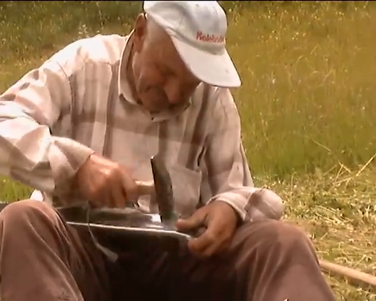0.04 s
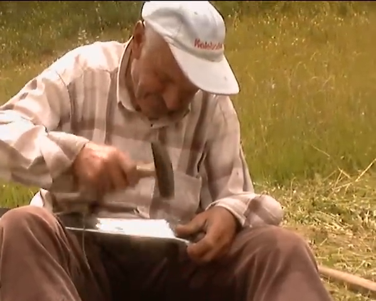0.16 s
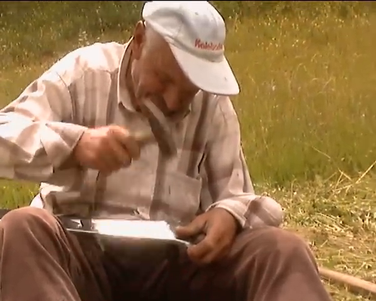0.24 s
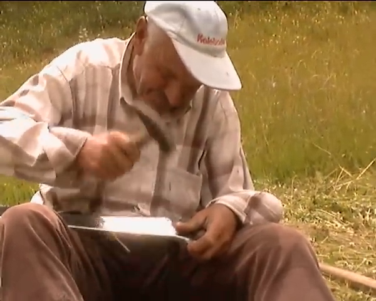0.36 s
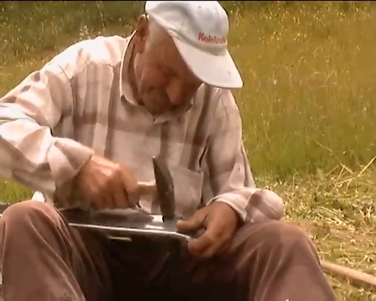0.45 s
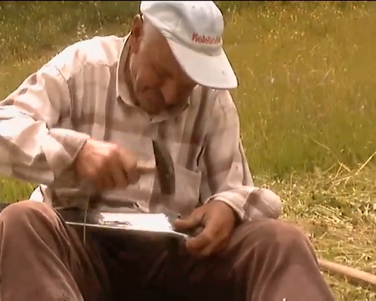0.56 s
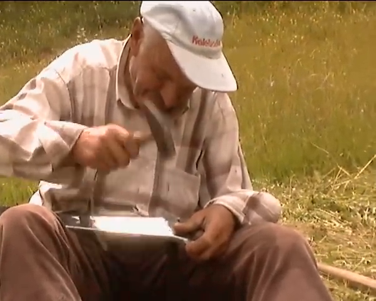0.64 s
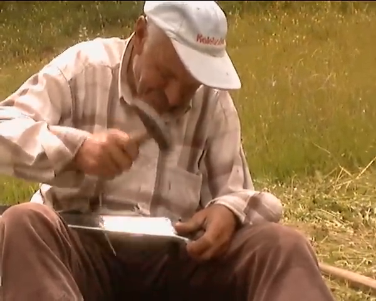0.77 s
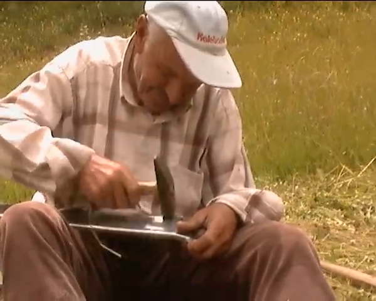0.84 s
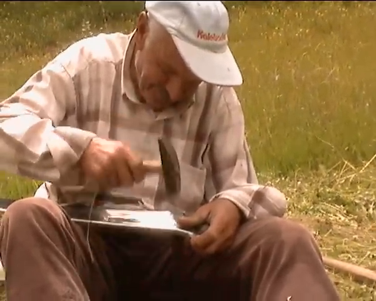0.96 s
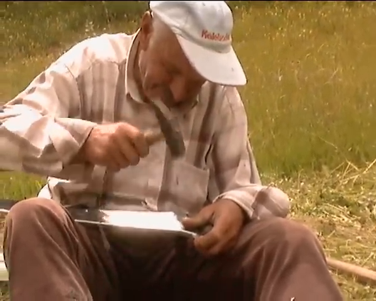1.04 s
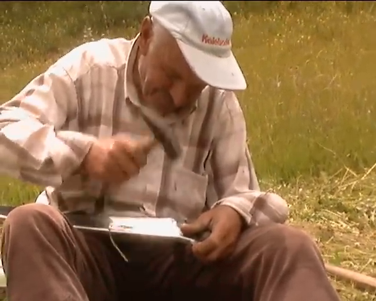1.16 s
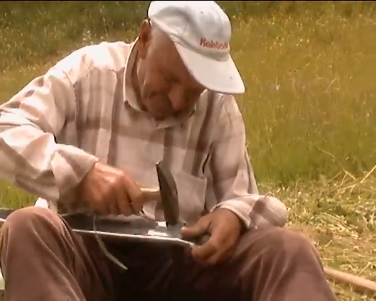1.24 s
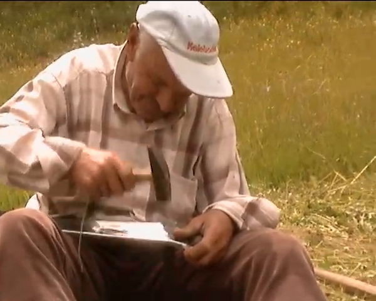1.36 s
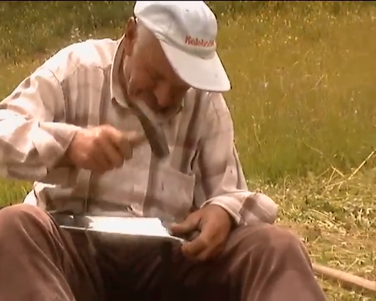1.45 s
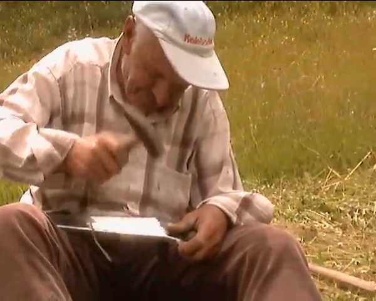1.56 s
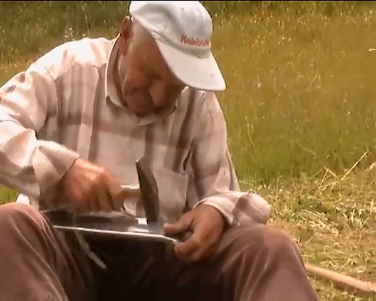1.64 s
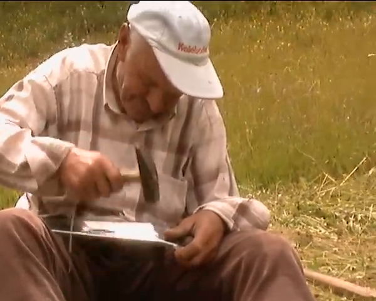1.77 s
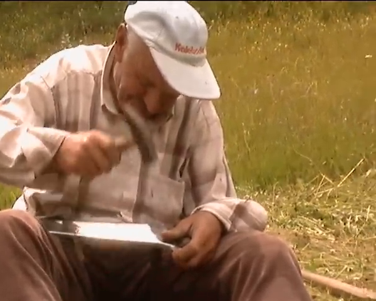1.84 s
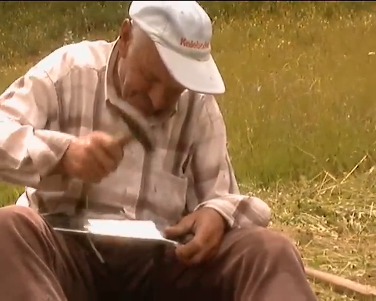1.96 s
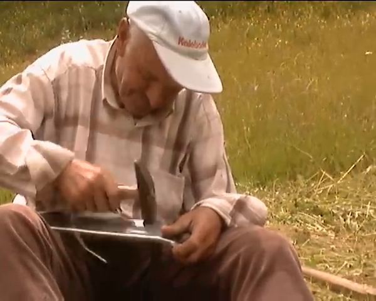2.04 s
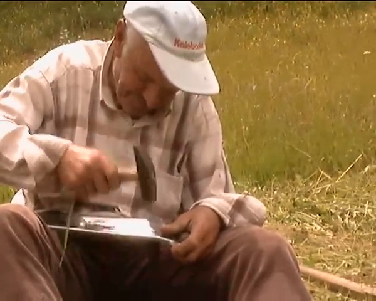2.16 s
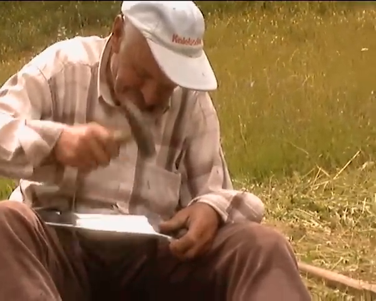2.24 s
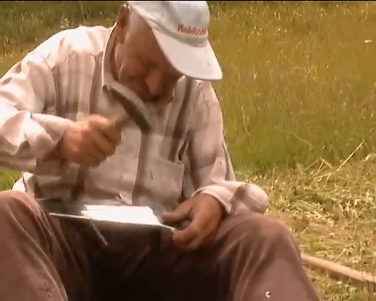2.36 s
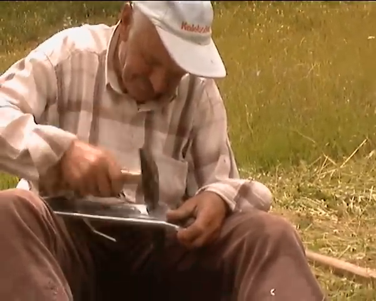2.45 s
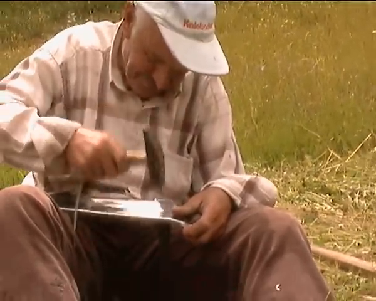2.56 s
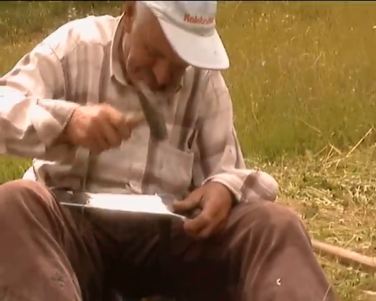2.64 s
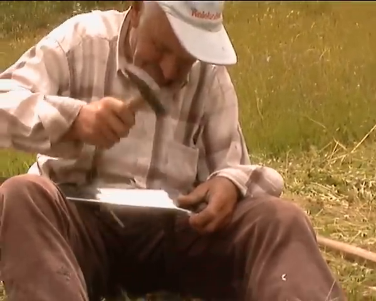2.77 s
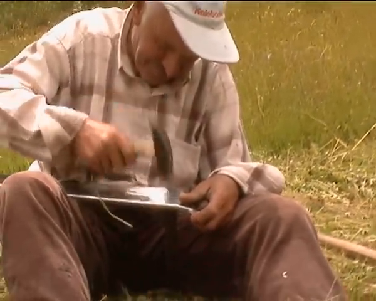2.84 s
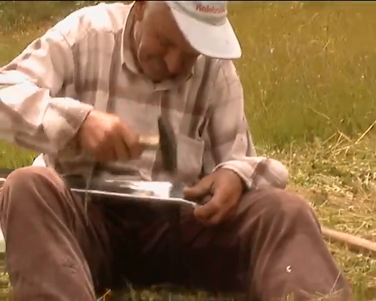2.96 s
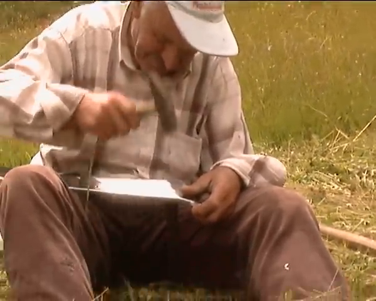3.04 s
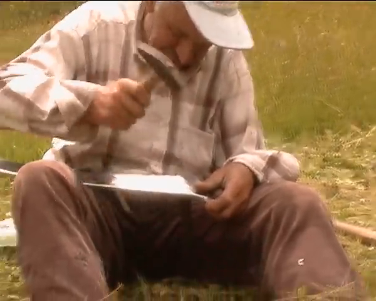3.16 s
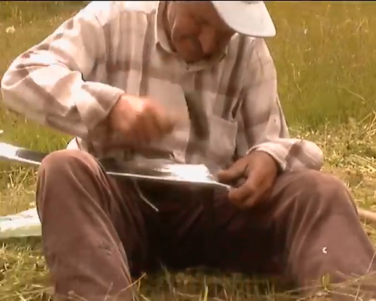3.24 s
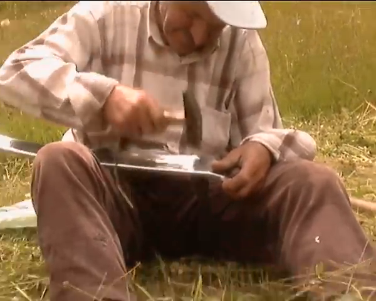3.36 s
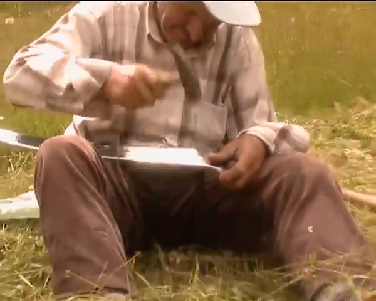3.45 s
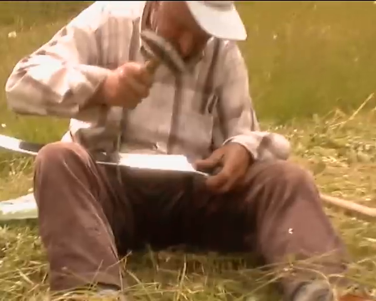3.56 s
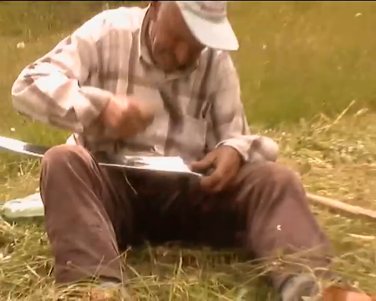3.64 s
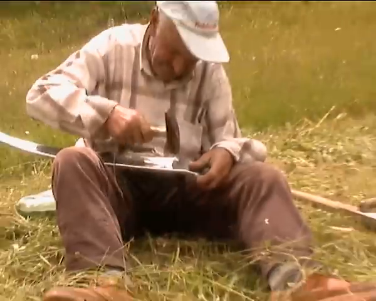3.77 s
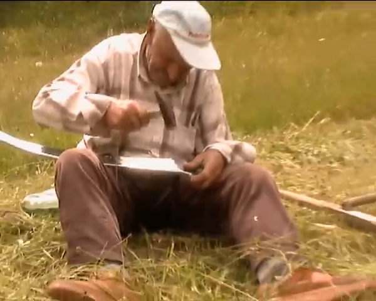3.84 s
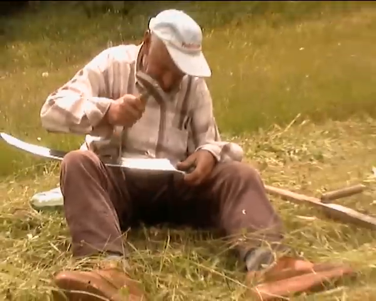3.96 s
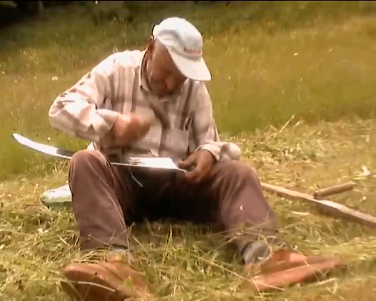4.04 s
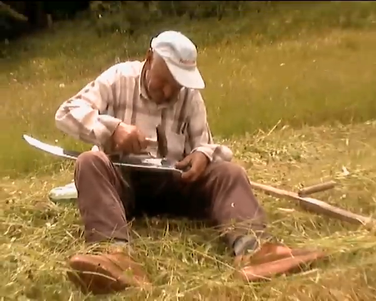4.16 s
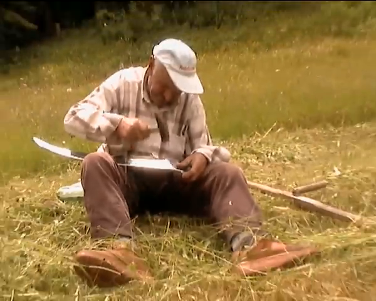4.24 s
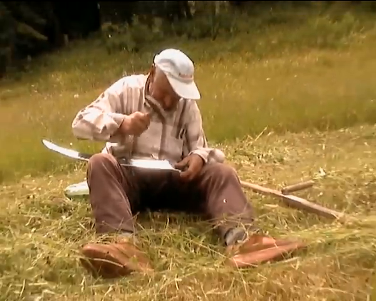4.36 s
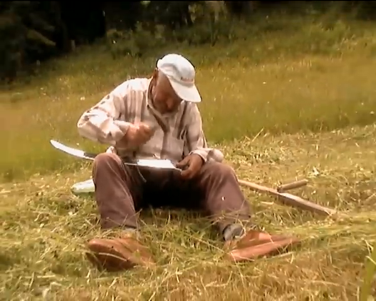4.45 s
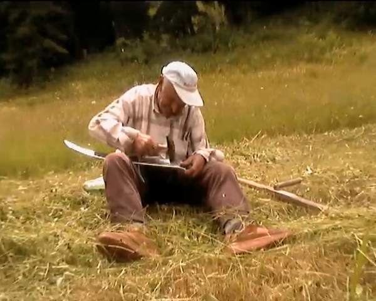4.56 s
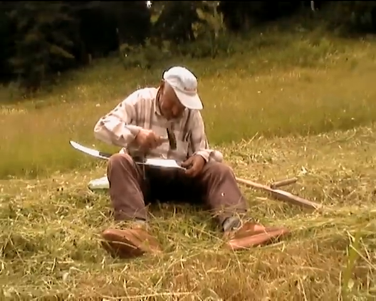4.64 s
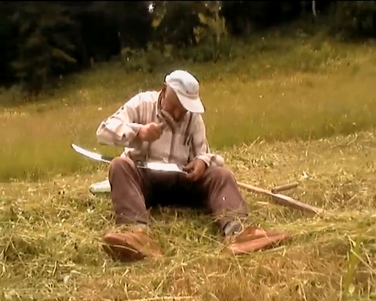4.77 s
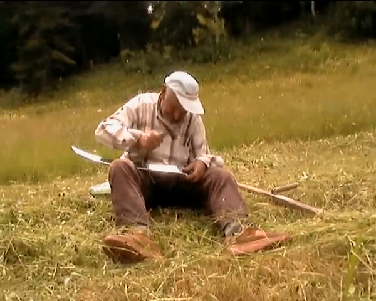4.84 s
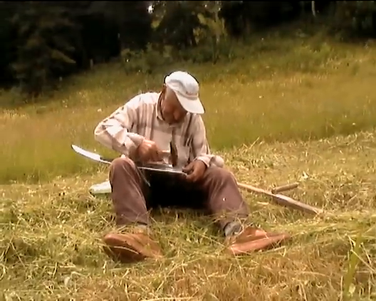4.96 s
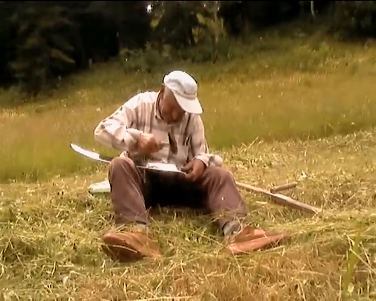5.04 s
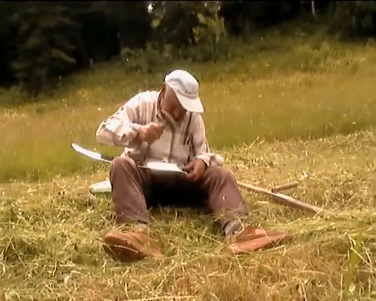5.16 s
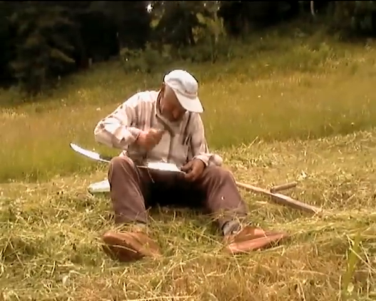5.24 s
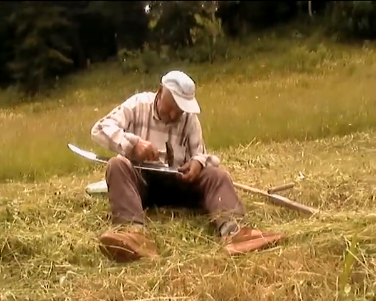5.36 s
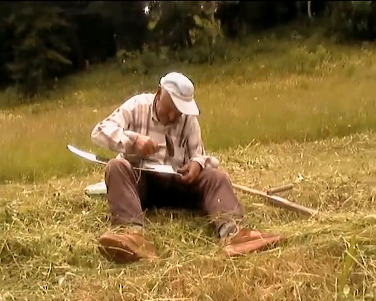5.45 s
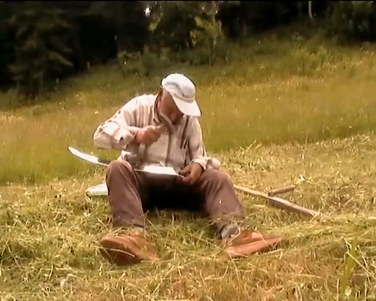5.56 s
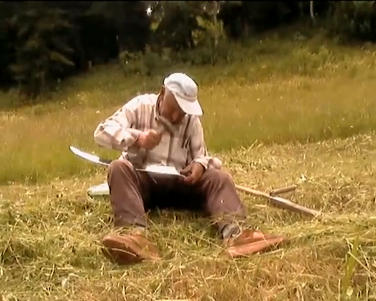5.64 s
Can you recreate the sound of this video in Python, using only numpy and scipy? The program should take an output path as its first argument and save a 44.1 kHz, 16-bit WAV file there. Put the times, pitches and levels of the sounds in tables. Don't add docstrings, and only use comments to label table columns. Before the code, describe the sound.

Fourteen evenly paced hammer blows on thin steel, from the very start to the end, dominate a quiet grassy field. Cracks are dry and high, with a faint thump and a dull slope reflection; the ringing varies as the blade slides between blows. Insects rasp weakly, a breeze briefly rumbles, and small plastic creaks occur around the middle. A single-channel camera microphone stays at a constant few metres, ducking slightly after every strike.

```python
import sys
import numpy as np
from scipy import signal
from scipy.fft import rfft, irfft, next_fast_len
from scipy.io import wavfile
from scipy.ndimage import map_coordinates

SR = 44100
rng = np.random.default_rng(int(sys.argv[2]) if len(sys.argv) > 2 else 0)


def bounce(signal):
    frames = np.transpose(np.atleast_2d(signal))
    limited = np.clip(frames, -1, 1)
    pcm = np.round(limited * 32767).astype(np.int16)
    wavfile.write(sys.argv[1], SR, pcm)


def volts_from_decibels(level):
    exponent = np.asarray(level, float) / 20
    return 10 ** exponent


N = 251370

# (time [s], level [dB])
GUST_LEVEL = [
    (0.0, -66),
    (0.47, -65),
    (0.68, -69),
    (1.67, -69.5),
    (2.2, -58.5),
    (2.68, -70.5),
    (3.09, -63.5),
    (3.33, -56),
    (3.49, -72.5),
    (5.7, -71),
]
# (frequency [Hz], density [dB per Hz])
GUST_COLOUR = [(15, 0), (25, -6.5), (80, 2.5), (160, -4), (300, -56)]
# (time [s], level [dB])
MEADOW_LEVEL = [
    (0.0, -61),
    (3.87, -59.5),
    (5.7, -60),
]
# (frequency [Hz], density [dB per Hz])
MEADOW_COLOUR = [(88, -6.5), (150, -2), (255, -1.5), (378, -4.5), (460, -3.5), (682, -8), (1120, -10.5),
                 (1530, -11.5), (5930, -12), (7370, -13), (10900, -13.5), (13600, -19.5), (16500, -54)]

# (time [s], crack [dB], thump [dB], ring [dB])
BLOWS = [(0.061, 0.5, -30.5, -8.5), (0.4713, 0.5, -36.5, 2), (0.8735, 0, -34.5, -0.6),
         (1.2663, -2, -33.5, -1.6), (1.6664, 0, -36, -1.3), (2.0753, 1.5, -35.5, -2.65),
         (2.484, 1.5, -41, 1.3), (2.8978, 2.5, -35.5, 1.1), (3.3047, 3, -44, -0.4), (3.713, -0.5, -38, -4),
         (4.124, -1, -36.5, 1.5), (4.5399, -0.5, -31.5, -18.5), (4.9462, 1.5, -40, 1.8),
         (5.3473, 2, -41.5, 2.5)]
BLADE_LIE = [(-0.08, 0.28, 0.77, 1.08), (0.108, 0.74, -0.033, 1.015), (0.11, 0.82, -0.2, 0.99),
             (0.159, 0.27, 0.21, 1.17), (0.41, 0.13, 0.32, 1.01), (0.458, 0.054, 0.3, 0.87),
             (0.47, 0.13, -0.022, 1.037), (0.62, -0.23, 0.73, 1.16), (0.63, 0.41, -0.095, 1.03),
             (0.66, -1.0, 0.32, 0.83), (0.77, -0.46, -0.49, 1.06), (0.89, -0.064, 0.65, 1.09),
             (0.901, 0.095, -0.28, 1.025), (0.94, -0.081, 0.029, 1.12)]
# (buzz length [s], buzz level [dB], hand closes after [s], added damping [dB per s])
BLADE_GRIP = [(0.036, -34, 0.33, 60), (.053, -24.5, 0.49, 59), (0.056, -29, 0.22, 28),
              (0.046, -29, 0.29, 50), (0.053, -27, 0.2, 45), (0.05, -29, 0.47, 58),
              (0.062, -27.5, 0.17, 88), (.072, -25.5, 0.24, 130), (0.064, -30, 0.31, 42),
              (0.05, -29, 0.37, 55), (0.06, -25, 0.64, 58), (0.048, -44, 0.14, 62), (0.05, -27, 0.18, 184),
              (0.069, -25, 0.16, 140)]
# (frequency [Hz], level [dB], t60 [s])
CRACK_PEAKS = [(1578, -5, 0.0086), (3190, 2, 0.0037), (5037, 0.5, 0.0043), (6730, 0, 0.0036),
               (8200, -10, 0.0051), (11740, -11, 0.0037)]
# (frequency [Hz], level [dB], t60 [s])
STAKE_MODES = [(118, -16.5, 0.038), (202, -2, 0.018), (312, 8.5, 0.014), (393, -9, 0.042)]
# (frequency [Hz], density [dB per Hz])
BUZZ_COLOUR = [(150, -35.5), (500, -14), (850, -12.5), (1400, -7.5), (2300, -1.4), (4000, -1.5), (6500, -8),
               (9000, -10.5), (12500, -15), (16000, -44.5)]
# (frequency [Hz], level [dB])
CLATTER_COLOUR = [(400, -6), (800, 4), (1300, -11), (2200, 12.5), (3500, -4.5), (6000, 9.5), (8500, 4.5),
                  (11500, -3), (15500, -39)]
# (frequency [Hz], t60 [s])
CLATTER_T60 = [(500, 0.32), (2000, 0.12), (6000, 0.08), (12000, 0.072)]

# (frequency at spot 0 [Hz], frequency at spot 1 [Hz])
BLADE_HZ = [(430, 444), (599, 618), (1292, 1293), (1364, 1364), (1464, 1517), (1649, 1694), (1800, 1814),
            (1856, 1872), (1931, 1945), (1980, 1985), (2257, 2264), (2341, 2359), (2361, 2375),
            (2845, 2887),
            (2991, 2987), (3277, 3303), (3394, 3392), (3486, 3484), (3633, 3649), (3912, 3922), (4051, 4041),
          (4137, 4158), (4191, 4204), (4247, 4251), (4269, 4274), (4516, 4563), (4730, 4746), (5009, 5011),
            (5409, 5373), (5518, 5509), (5683, 5656), (5765, 5780), (5817, 5818), (6061, 6052), (6318, 6347),
           (6382, 6373), (6607, 6596), (6813, 6816), (7564, 7591), (8260, 8256), (8552, 8533),
           (11138, 11119)]
# (level [dB], t60 [s], spot of a belly [edge lengths], half waves along the
BLADE_WAVES = [(-56.5, 1.5, 0.42, 3.71), (-47, 1.2, 1.857, 0.294), (-45.5, 0.49, 0.58, 2.54),
               (-30, 0.34, 0.53, 0.82), (-29.5, 0.33, 0.42, 1.46), (-39, 1.07, 1.156, 0.488),
               (-26, 0.3, 0.53, 3.63), (-33, 0.34, 0.38, 2.03), (-25.5, 0.29, -0.62, 0.53),
               (-19.5, 0.15, 1.48, 0.32), (-29.5, 0.29, 0.48, 2.34), (-24, 0.21, 0.555, 2.95),
               (-35.5, 0.37, 0.53, 3.47), (-43.5, 0.5, 0.63, 3.1),
               (-40, 0.46, 0.026, 0.49), (-28.5, 0.36, 0.46, 1.36), (-30, 0.23, 0.043, 0.52),
             (-26, 0.27, 1.9, 0.35), (-23, 0.33, 0.617, 0.66), (-25.5, 0.19, 0.58, 3.4),
             (-41.5, 0.51, -0.75, 0.51), (-41.5, 0.48, 0.45, 1.8), (-34.5, 0.42, 1.07, 0.61),
             (-31.5, 0.37, 0.29, 0.53), (-22, 0.2, -0.11, 5.7), (-47, 0.42, -0.75, 0.26),
             (-41.5, 0.47, -3.1, 3.74), (-21, 0.15, 0.095, 0.46),
               (-36, 0.3, 0.51, 6.1), (-36, 0.29, 0.45, 3), (-45, 0.33, 0.1, 1.5), (-24.5, 0.16, 0.43, 0.78),
              (-45, 0.25, 0.47, 4.2), (-33, 0.37, 0.52, 3.8), (-29, 0.53, 1.17, 0.48),
              (-28, 0.36, -0.94, 0.3), (-31, 0.21, 2.0, 0.3), (-26, 0.2, 1, 0.26), (-31, 0.28, -0.32, 0.36),
              (-28, 0.2, 0.09, 0.75), (-37, 0.21, 0.52, 3.5), (-26, 0.14, 1.43, 0.59)]
# (gain at full tilt [dB], gain at full pressure [dB])
BLADE_HOLD = [(-9.4, 6.5), (6.5, 9.5), (-14, -30), (-3, -1), (7.5, 4.5), (18.5, -1), (-2.5, 2.5), (3.5, 0),
              (17.5, 4), (9, 5.5), (-5, -3.2), (2, 3), (-10, -14), (-6, -3),
              (6, -2.5), (-1, -10), (7.5, 3), (-10, 5), (-4.5, -1.3), (-13, 10), (22, 20), (2, 5), (5, -2),
            (6.5, -2.5), (-7, -3.5), (-5, 23), (-8, -10.6), (9, -8),
              (-6, -12), (3, 16), (2, -7), (17, 10), (-18, -13), (-8, -3), (2.3, -2), (-4, 7), (4, -1),
             (-3, 6.3), (11, -7.5), (-9, 5), (-2.5, 19), (-3, 4)]

# (first stroke [s], last stroke [s], rate [strokes per s], pitch [Hz], level [dB])
HOPPERS = [
    (0.155, .36, 27, 9000, -63),
    (1.101, 1.25, 29, 7000, -62),
    (2.62, 2.8, 27, 9000, -64),
    (3.835, 3.97, 30, 8520, -58),
    (4.299, 4.5, 34, 6930, -59.5),
    (5.06, 5.19, 31.6, 9000, -64),
    (5.189, 5.34, 34., 6360, -58.5),
    (5.553, 5.7, 24, 7500, -63),
    (.1, 4.8, 63.5, 11200, -71),
]
# (time [s], peak [dB])
CREAKS = [(0.327, -55), (1.147, -53), (2.843, -57), (3.044, -56), (3.092, -54), (3.137, -54), (3.161, -47),
          (3.178, -47), (3.201, -45.5), (3.229, -46), (3.329, -40), (3.379, -41), (3.423, -42),
          (3.443, -41), (3.464, -46), (3.484, -43.5), (3.532, -42.5), (3.551, -38.5), (3.679, -48),
          (3.696, -46), (4.728, -56.5)]
# (frequency [Hz], density [dB per Hz])
CASE_COLOUR = [(250, -19), (500, -5), (750, -10.5), (1020, 2.5), (1400, -10), (1900, 0), (2500, -14),
               (3300, -12), (5000, -20), (8000, -36)]


def along(points, hz):
    f, v = np.transpose(points)
    return np.interp(np.log(hz + 1), np.log(f + 1), v)


def curve(rows):
    return np.interp(np.arange(N) / SR, *np.transpose(rows))


def wobble(rate):
    knots = rng.standard_normal(int(N * rate / SR) + 4)
    return map_coordinates(knots, [np.arange(N) * rate / SR])


def noise(colour):
    size = next_fast_len(N)
    hz = np.fft.rfftfreq(size, 1 / SR)
    x = irfft(rfft(rng.standard_normal(size)) * volts_from_decibels(along(colour, hz)), size)[:N]
    return x / x.std()


def ring(modes, seconds, attack, phase=0):
    hz, db, t60 = np.transpose(modes)[:, :, None]
    t = np.arange(round(seconds * SR)) / SR
    swing = volts_from_decibels(db - 60 * t / t60) * np.sin(2 * np.pi * hz * t + phase)
    return swing.sum(axis=0) * (1 - np.exp(-t / attack))


def add(track, s, sound):
    track[round(s * SR):][:len(sound)] += sound


def breeze():
    return volts_from_decibels(curve(GUST_LEVEL) + 3.4 * wobble(29)) * noise(GUST_COLOUR)


def meadow():
    return volts_from_decibels(curve(MEADOW_LEVEL) + 0.28 * wobble(7.6)) * noise(MEADOW_COLOUR)


def face_crack(crack_db, rattle):
    spread = [120, 1.5, 0]  # Hz, dB, s
    face = CRACK_PEAKS + rng.normal(0, 1, (len(CRACK_PEAKS), 3)) * spread
    t = np.arange(SR // 10) / SR
    grit = 0.3 * rattle[:len(t)] * volts_from_decibels(-60 * t / 0.0078)
    crack = volts_from_decibels(crack_db - 4.5) * (grit - ring(face, 0.1, attack=0.0001))
    return signal.lfilter(*signal.butter(2, 1100 / (SR / 2), "high"), crack)


def stake_thump(thump_db):
    return volts_from_decibels(thump_db + 17.5) * ring(STAKE_MODES, 0.1, attack=0.0023)


def slope_echo(crack, thump, thump_db):
    echo_db = -12.5 - 0.65 * (thump_db + 37.5)
    dull = signal.butter(1, 1800 / (SR / 2))
    return volts_from_decibels(echo_db) * signal.lfilter(*dull, crack + 1.27 * thump)


def blade_modes(ring_db, spot, tilt, pressure, damping):
    start_hz, end_hz = np.transpose(BLADE_HZ)
    db, t60, belly, waves = np.transpose(BLADE_WAVES)
    node_leak = 0.069
    shape = np.abs(np.cos(np.pi * waves * (spot - belly))) + node_leak
    hold_db = np.dot(BLADE_HOLD, [tilt, pressure])
    db = db + ring_db + 20 * np.log10(shape) + hold_db
    hz = start_hz + spot * (end_hz - start_hz)
    return np.transpose([hz, db, t60 / damping])


def blade_ring(ring_db, lie, hand_s, hand_db):
    modes = blade_modes(ring_db, *lie)
    blade = ring(modes, 0.5, attack=0.013, phase=2 * np.pi * rng.random((len(modes), 1)))
    t = np.arange(SR // 2) / SR
    return blade * volts_from_decibels(-hand_db * np.maximum(t - hand_s, 0))


def blade_clatter(ring_db, hand_damping, count=90):
    place, size, life, turn = rng.random((count, 4)).T
    hz = 1150 + 14000 * place ** 1.5
    db = along(CLATTER_COLOUR, hz) + 3 - 16 * size
    t60 = along(CLATTER_T60, hz) * (0.34 + 0.88 * life) / (0.84 * hand_damping)
    modes = np.transpose([hz, db, t60])
    crowd = ring(modes, 0.18, attack=0.00087, phase=2 * np.pi * turn[:, None])
    return volts_from_decibels(-22 + 0.37 * ring_db) * crowd / np.sqrt(count / 10)


def blade_buzz(buzz_s, buzz_db, rattle):
    t = np.arange(SR // 2) / SR
    fade = volts_from_decibels(-200 * t - 650 * np.maximum(t - buzz_s, 0))
    afterglow = volts_from_decibels(-18 - 60 * t / 0.65)
    return volts_from_decibels(buzz_db) * (fade + afterglow) * rattle[:len(t)]


def hammer():
    out = np.zeros(N + SR)
    rattle = np.tile(noise(BUZZ_COLOUR) * volts_from_decibels(3.6 * wobble(180)), 2)
    for blow, lie, grip in zip(BLOWS, BLADE_LIE, BLADE_GRIP):
        s, crack_db, thump_db, ring_db = blow
        buzz_s, buzz_db, hand_s, hand_db = grip
        start = round(s * SR)
        crack = face_crack(crack_db, rattle[::-1][start:])
        thump = stake_thump(thump_db)
        add(out, s, crack + thump)
        add(out, s + 0.0032, volts_from_decibels(-8.5) * crack)
        add(out, s + 0.0258, slope_echo(crack, thump, thump_db))
        add(out, s, blade_ring(ring_db, lie, hand_s, hand_db))
        add(out, s, blade_clatter(ring_db, lie[-1]))
        add(out, s, blade_buzz(buzz_s, buzz_db, rattle[start:]))
    return out[:N]


def grasshoppers():
    out = np.zeros(N + SR)
    t = np.linspace(-0.5, 0.5, 700)
    for first, last, rate, hz, db in HOPPERS:
        width_hz = max(1430, 10420 - hz)
        for s in np.arange(first, last, 1 / rate):
            tooth_hz = hz + width_hz * (rng.random((20, 1)) - 0.5) + 900 * t
            cycles = np.cumsum(tooth_hz, axis=1) / SR + rng.random((20, 1))
            rasp = np.sin(2 * np.pi * cycles).sum(axis=0)
            stroke_db = db + rng.normal(0, 1.8) - 8
            add(out, s - 0.008, volts_from_decibels(stroke_db) * np.cos(np.pi * t) ** 2 * rasp)
    return out[:N]


def case_creaks():
    slips = np.zeros(N + SR)
    t = np.arange(SR // 8) / SR
    for s, db in CREAKS:
        add(slips, s, volts_from_decibels(db - 60 * t / 0.048) * (1 - np.exp(-t / 0.0013)))
    return slips[:N] * noise(CASE_COLOUR)


def scene():
    return (breeze() + meadow() + hammer() + grasshoppers() + case_creaks())[None]


def low_pass(x):
    return signal.sosfilt(signal.butter(12, 17110, fs=SR, output="sos"), x)


def record(dry):
    t = np.arange(N) / SR
    x = signal.sosfilt(signal.butter(2, 13500 / (SR / 2), output="sos"), dry)
    duck_db = np.zeros(N)
    for s, *_ in BLOWS:
        duck_db += -8 * np.exp(-np.abs(t - s) / 0.021) * (t >= s + 0.001)
    x = x * volts_from_decibels(duck_db)
    x = x / (1 + np.abs(x / 0.8) ** 6) ** (1 / 6)
    x = signal.sosfilt(signal.butter(16, 16300 / (SR / 2), output="sos"), x)
    return low_pass(x)


dry = scene()
out = record(dry)
bounce(out)
```